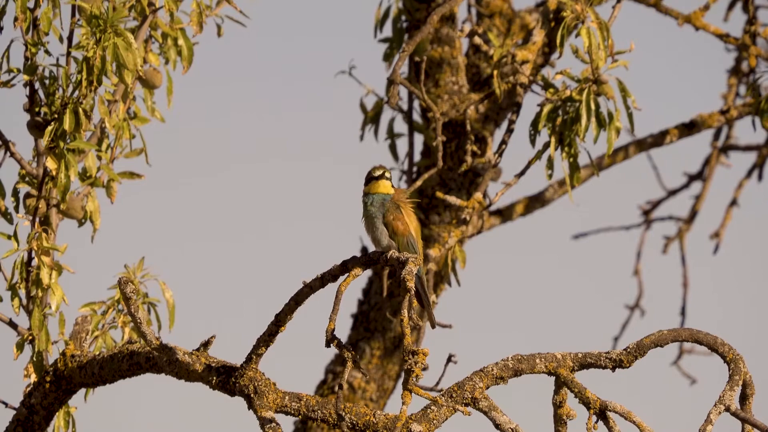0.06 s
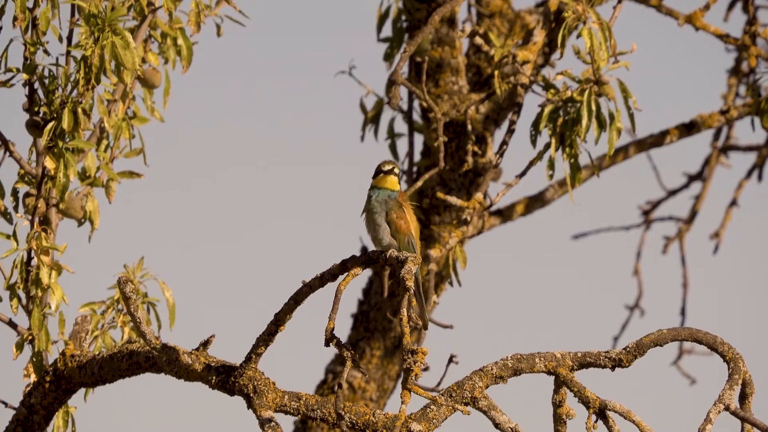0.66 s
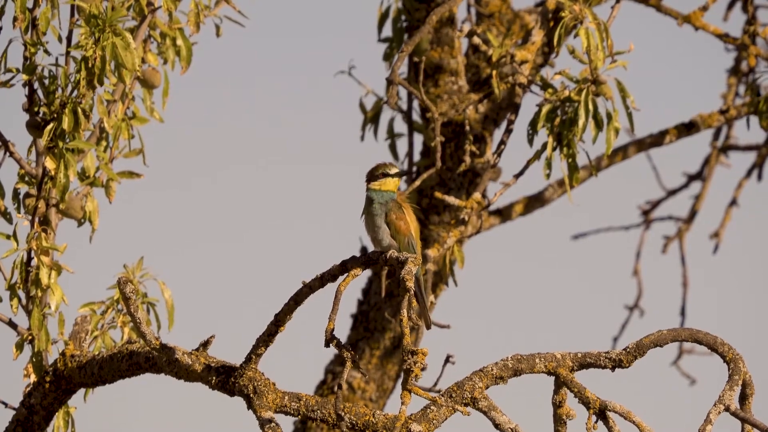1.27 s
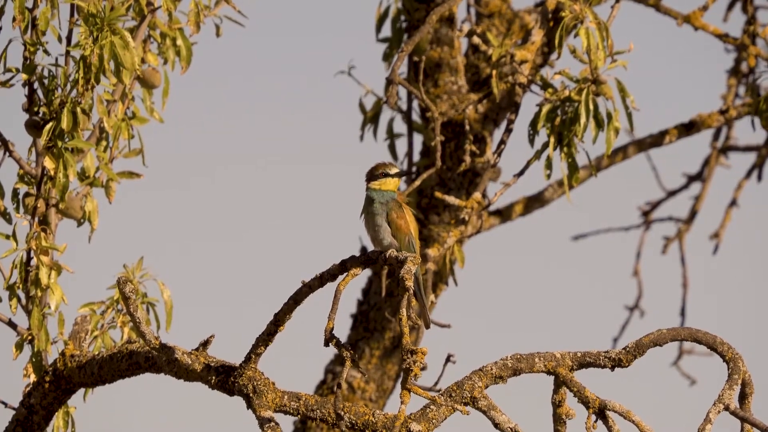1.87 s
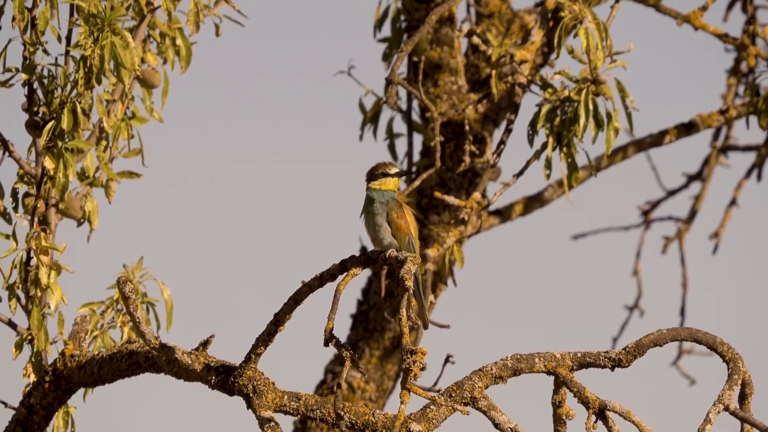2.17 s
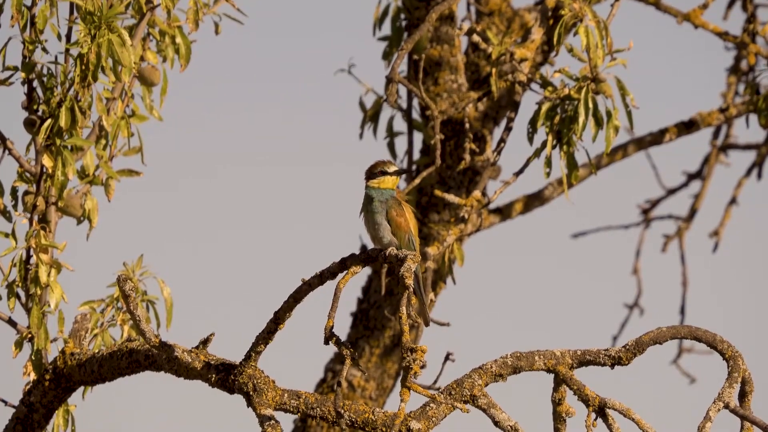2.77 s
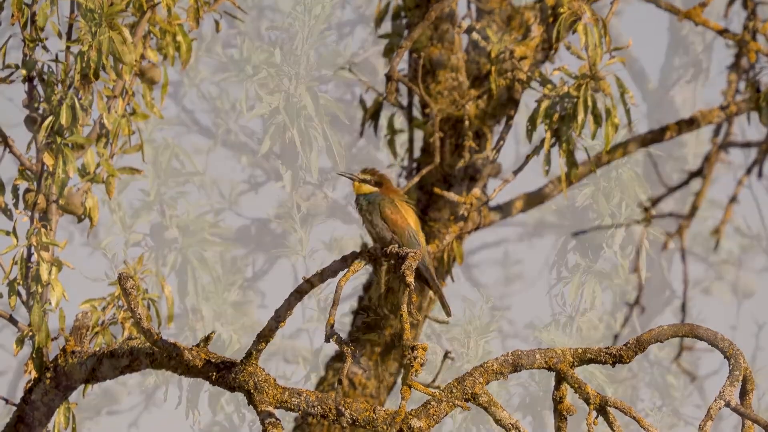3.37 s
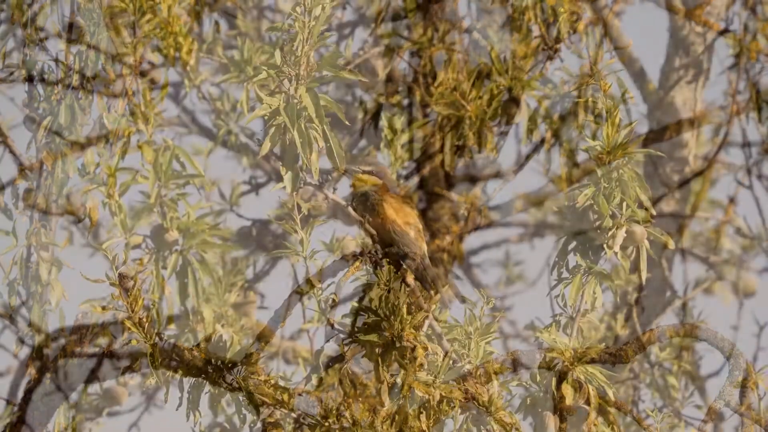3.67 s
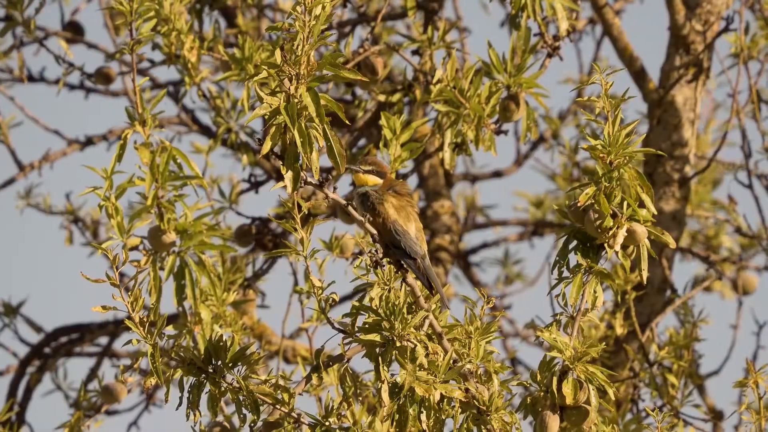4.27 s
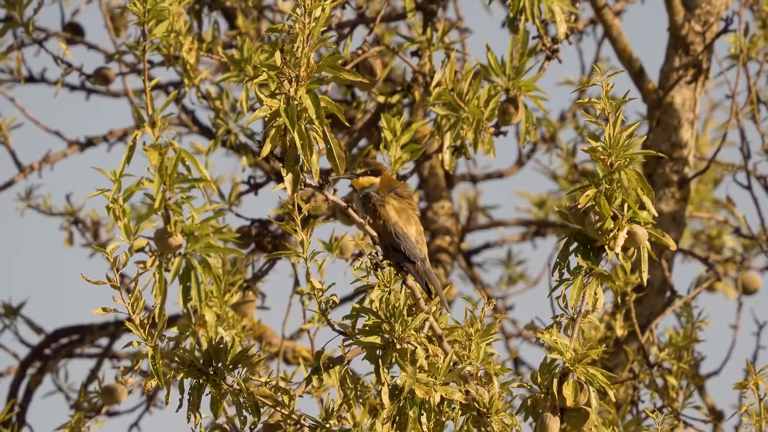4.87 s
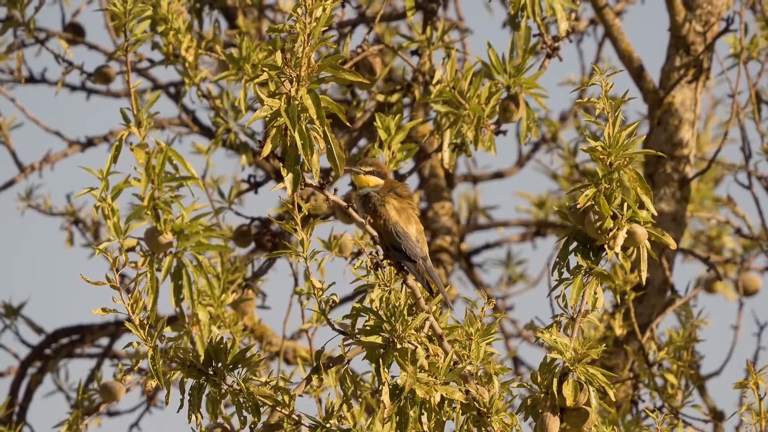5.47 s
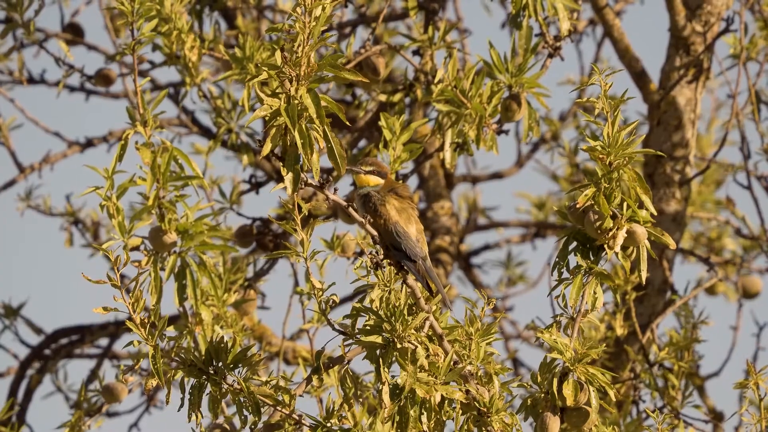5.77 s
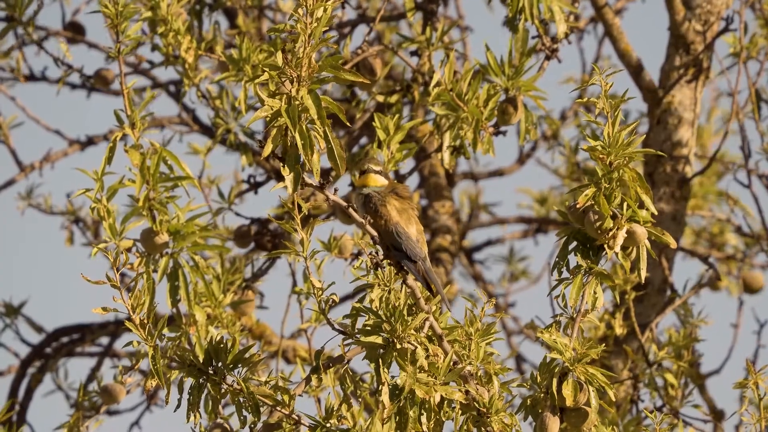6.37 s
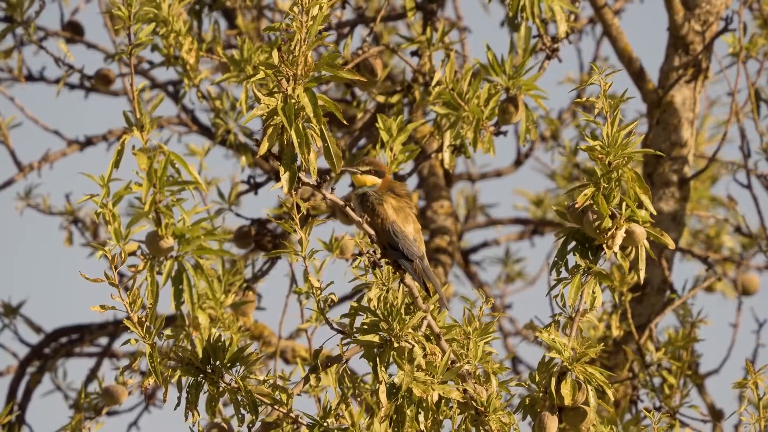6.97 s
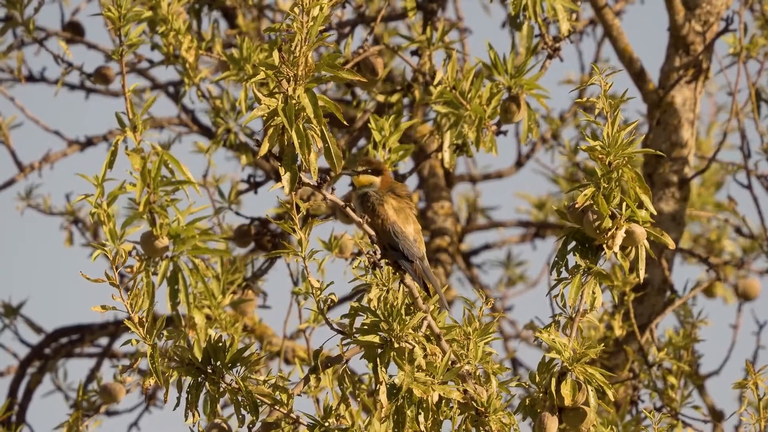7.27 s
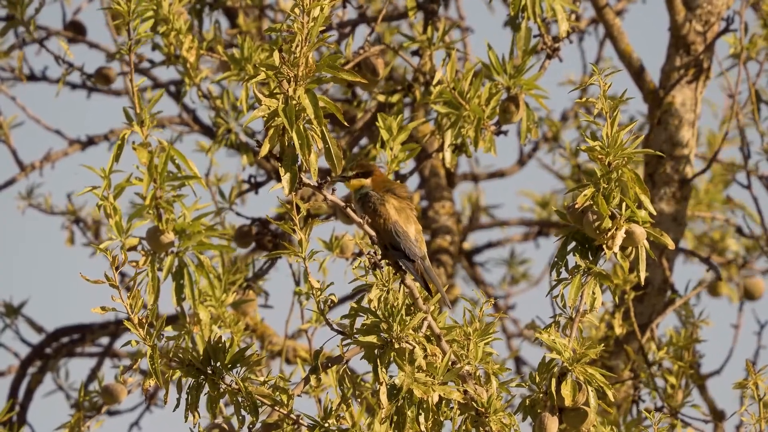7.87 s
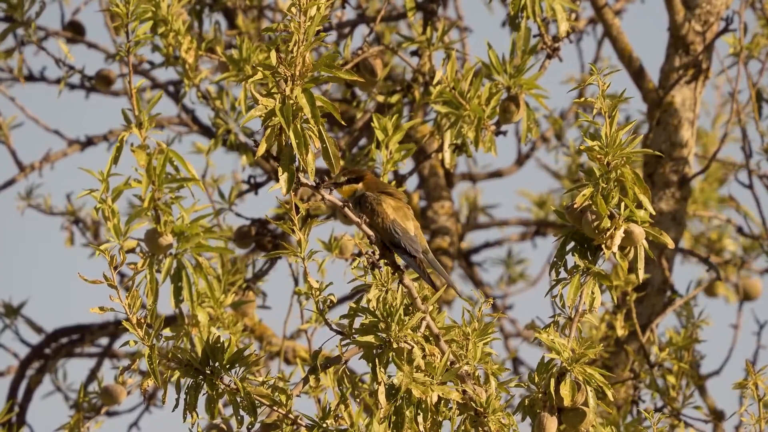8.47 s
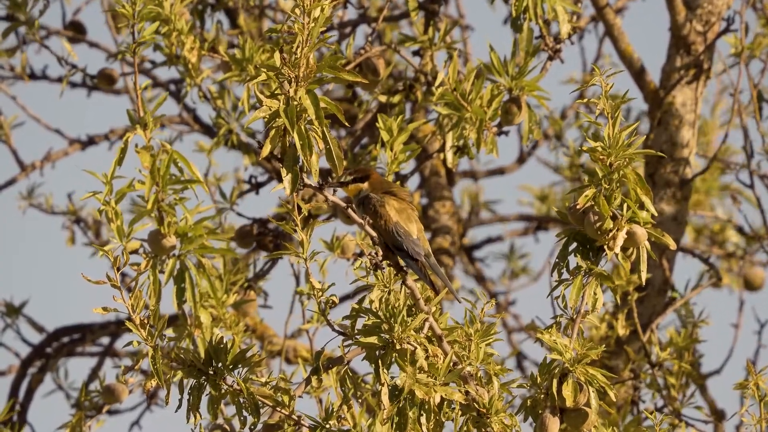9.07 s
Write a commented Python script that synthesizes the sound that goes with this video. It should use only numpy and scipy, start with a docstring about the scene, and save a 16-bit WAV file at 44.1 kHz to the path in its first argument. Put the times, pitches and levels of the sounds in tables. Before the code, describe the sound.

Short, rolling, whistled bird calls come in bursts from a nearby tree, while farther birds trill faintly above a soft wind rumble.

```python
"""Bee-eaters call from a tree in rolling phrases of whips, yelps and soft low whistles; others answer
from afar. Each syllable is one gliding tone, shaken by the syrinx and scattered by trunk and branches.
A small bird chips faintly, and a few dry ticks and brushes sound close by. Wind rumbles under a faint
hiss, and everything drops out for a moment a little before the middle."""
import sys
import numpy as np
from scipy import signal
from scipy.fft import rfft, irfft, next_fast_len
from scipy.io import wavfile
from scipy.ndimage import uniform_filter1d

SR = 44100
rng = np.random.default_rng(int(sys.argv[2]) if len(sys.argv) > 2 else 0)


def transcribe(signal):
    """Save signal, clipped to [-1, 1], as a 16-bit WAV file at the path in sys.argv[1]."""
    frames = np.atleast_2d(signal).T
    limited = np.clip(frames, -1, 1)
    pcm = np.round(limited * 32767).astype(np.int16)
    wavfile.write(sys.argv[1], SR, pcm)


N = 402191
TIME = np.arange(N) / SR
DROPOUT_START_S, DROPOUT_END_S = 3.62, 3.735


def bee_eaters(direct_db=-5, branches_db=-4, grove_db=-21, far_direct_db=-3, far_grove_db=-6):
    """Near birds come straight and off the branches; far ones carry more of the grove's echo."""
    flutter, roll = syrinx_flutter(), band_noise(59, 0.43)
    near, far = np.zeros((2, N))
    near_db, depth_db = -39.5, 21  # calls softer than near_db recede, fully far depth_db lower
    voices = [(call, np.clip((near_db - call[-1]) / depth_db, 0, 1)) for call in calls()]
    voices += [(call, 0) for call in linking_whistles()] + [(call, 1) for call in far_flock()]
    for (shape, start, length, pitch_hz, level_db), distance in voices:
        stretch = rng.integers(N - SR) + np.arange(SR // 2)  # every syllable shakes in its own way
        tone = syllable(shape, length, pitch_hz, level_db, flutter[stretch], roll[stretch])
        add(near, start, np.sqrt(1 - distance) * tone)
        add(far, start, np.sqrt(distance) * tone)
    near, far = throat(near), throat(far)
    direct = amp(direct_db) * near + amp(far_direct_db) * far
    right_lag_s = np.where(TIME < DROPOUT_START_S, .00003, .00011)  # later birds sit further left
    return (np.array([direct, np.interp(TIME - right_lag_s, TIME, direct)])
            + amp(branches_db) * scatter(near, t60=0.079, delay=0.0029)
            + amp(grove_db) * scatter(near, t60=0.42, delay=0.005)
            + amp(far_grove_db) * scatter(far, t60=0.36, delay=0.0049))


# Syllable contours. Each row: share of the length, pitch factor, level in dB, flutter from 0 to 1.
WHIP_SHAPE = [(0, .58, -21, .15), (.13, .69, -8, .4), (.27, 0.9, 2, 0.46), (.38, 0.96, 1.5, 0.36),
              (.49, 1.01, -4, 0.15), (.6, .97, -19, .3), (.8, .74, -17.5, .45), (1, .59, -20, .15)]
PRRUP_SHAPE = [(0, .66, -8.5, 0.054), (.12, .74, -8.5, .05), (.26, .84, -7.5, 0.1), (.29, .97, -3, 0.89),
               (.43, .93, -9.5, 0.45), (.55, 1.02, 4.5, 0.42), (.72, .97, -9, 0.45), (.86, .9, -14, 0.98),
               (1, .8, -22, 0.95)]
BURR_SHAPE = [(0, 1.02, -18, .7), (.12, .96, -6.5, .55), (.26, .95, -2, .5), (.42, .96, -9, .55),
              (.6, .99, 0, .6), (.74, .98, -2.5, .75), (.84, .98, -8, .75), (1, .88, -24, .7)]
YELP_SHAPE = [(0, .87, -16.5, .7), (.13, .81, -4.5, .45), (.36, 0.77, -13.5, .3), (.53, .89, 6, 0.45),
              (.64, 0.93, -1.5, .3), (.74, 1, -7.5, 0.85), (.85, 0.98, -15.5, .7), (1, 0.65, -11, 0.29)]
YAP_SHAPE = [(0, .72, -19.5, 0), (.15, .89, -5, 0.13), (.27, .93, -2.5, 0.31), (.39, 0.93, -12, 0),
             (.49, 1, -4.5, .45), (.63, 1, 0.5, .55), (.78, 0.98, -12, 0.76), (1, 0.76, -16, 0.99)]
SLUR_SHAPE = [(0, 1.08, -8, 0.99), (.14, 1.05, 3.5, 0.59), (.35, 1.03, 0, .4), (.6, .99, 7, .2),
              (.8, 0.89, -9, 0.22), (1, 0.77, -14, 0.38)]
TRILL_SHAPE = [(0, .78, -17, 0.083), (.2, .86, -4, 0.099), (.27, 1, -1.5, 0.57), (.55, 1.01, -2, 0.7),
               (.8, .98, 0.5, 0.5), (1, 0.83, -16.5, 1)]
# Sharp whips and single rolled "prrup" calls. Each row: start in seconds, level in dB.
WHIPS = [(.487, -27.5), (1.097, -27.5), (1.4, -28.5), (2.192, -51.5), (2.397, -51), (2.552, -49.5),
         (4.632, -30), (5.067, -27.5), (5.991, -22), (6.413, -21.5), (6.682, -23), (8.757, -25.5)]
PRRUPS = [(2.535, -46.5), (3.575, -46), (5.525, -28.5), (7.385, -27.5)]
# Burrs that close a phrase. Each row: start in seconds, pitch in Hz, level in dB.
BURRS = [(.918, 2042, -30.5), (1.262, 1877, -33.5), (1.56, 1965, -34.5), (6.543, 1950, -30.5),
         (6.846, 1910, -29.5)]
# Yelps, one loud yap, falling slurs and answering trills.
# Each row: start in seconds, length in seconds, pitch in Hz, level in dB.
YELPS = [(.636, 0.072, 2265, -32), (0.773, 0.083, 2263, -32), (4.785, 0.093, 2180, -33.5),
         (6.146, .087, 2332, -28), (8.915, 0.086, 2267, -30)]
YAPS = [(0.354, .086, 1950, -23)]
SLURS = [(.061, 0.053, 1755, -36.5), (4.943, 0.093, 1812, -39), (5.23, 0.046, 1728, -41.5),
         (6.294, .08, 1860, -32), (9.068, 0.082, 1800, -35)]
TRILLS = [(.145, .1, 2090, -50.5), (0.444, 0.075, 2100, -45.5), (.83, 0.084, 2150, -46.5),
          (2.164, 0.12, 2020, -55.5), (2.345, .15, 1943, -54), (2.646, 0.056, 2024, -48.5),
          (2.758, .14, 2008, -46.5), (2.894, .11, 2087, -54), (3.001, .13, 2005, -45.5),
          (3.114, .13, 2130, -46.5), (3.321, 0.16, 2022, -48.5), (4.273, .13, 2366, -54),
          (5.796, .15, 2170, -48), (7.045, .13, 2195, -48.5)]
WHIP_S = .072


def calls(whip_hz=2517, hz_per_db=3.5, usual_db=-27, burr_s=.087, prrup_s=.16, prrup_hz=2025):
    """The phrases as (shape, start, length, pitch, level); louder whips are a little higher."""
    score = [(WHIP_SHAPE, s, WHIP_S, whip_hz + hz_per_db * (db - usual_db), db) for s, db in WHIPS]
    score += [(BURR_SHAPE, s, burr_s, hz, db) for s, hz, db in BURRS]
    score += [(PRRUP_SHAPE, s, prrup_s, prrup_hz, db) for s, db in PRRUPS]
    for shape, rows in (YELP_SHAPE, YELPS), (YAP_SHAPE, YAPS), (SLUR_SHAPE, SLURS), (TRILL_SHAPE, TRILLS):
        score += [(shape, *row) for row in rows]
    return score


def linking_whistles(max_gap_s=.13, end_hz=1601, rise_hz_per_s=1145, flutter=.04):
    """Soft whistles dip, then rise into the next syllable; the longer the gap, the deeper and softer."""
    ends = [0]  # the first phrase is already under way
    ends += [s + WHIP_S for s, _ in WHIPS] + [s + length for s, length, *_ in YELPS]
    for start, *_ in YELPS + BURRS + SLURS:
        gap = min(start - end for end in ends if end < start)
        if gap < max_gap_s:
            dip = 1 - rise_hz_per_s * gap / end_hz
            shape = [(0, dip + (1 - dip) / 4, 0, flutter), (.2, dip, 0, flutter), (1, 1, -1.5, flutter)]
            level_db = -42 - 18 * gap
            yield shape, start - gap, gap, end_hz, level_db


# The voice's harmonics. Each row: multiple of the pitch, level in dB.
HARMONICS = [(1, -2), (2, -29), (3, -28.5)]


def syllable(shape, length, pitch_hz, level_db, flutter, roll, swing=0.16, throb=0.68, roll_db=5):
    """One gliding tone; the syrinx flutters in pitch and strength together, which adds side bands."""
    t = np.arange(int(length * SR)) / SR
    share, *columns = np.transpose(shape)
    glide, contour_db, depth = (np.interp(t / length, share, column) for column in columns)
    hz = pitch_hz * glide * (1 + swing * depth * flutter[:len(t)])
    phase = 2 * np.pi * np.cumsum(hz) / SR
    reedy_db = 4 - 15 * depth  # steady tones are reedier than fluttering ones
    tone = sum(amp(db + reedy_db * (k > 1)) * np.sin(k * phase) for k, db in HARMONICS)
    pulsing = np.exp(throb * depth * np.roll(flutter, 40)[:len(t)])  # trails pitch by a quarter cycle
    rolling = amp(roll_db * depth * roll[:len(t)])  # slower, uneven surges give the rolled "r"
    fade = np.clip(np.minimum(t, length - t) / 0.002, 0, 1)
    return np.sqrt(2) * amp(level_db + contour_db) * pulsing * rolling * fade * tone


def syrinx_flutter(rate_hz=250):
    """The syrinx's fast, ragged shake: its rate wanders, and slower random lurches ride on it."""
    turns = np.cumsum(rate_hz * (1 + .17 * band_noise(70, 1))) / SR
    return .88 * np.sin(2 * np.pi * turns) + .24 * band_noise(100, .5)


# The colour of throat and beak. Each row: frequency in Hz, gain in dB.
THROAT_EQ = [(1100, -14), (1450, -3), (1750, 2), (2400, -3.5), (2750, -13.5), (3200, 1), (3700, 0.5),
             (4200, -9.5), (5600, -13), (7000, -26)]


def throat(voice):
    """Throat and beak pass the fundamental and dull the high overtones."""
    size = next_fast_len(N + 4096)
    gain = amp(curve_at(THROAT_EQ, np.fft.rfftfreq(size, 1 / SR)))
    return irfft(rfft(voice, size) * gain, size)[:N]


def scatter(sound, t60, delay):
    """Trunks and branches return many small, dying reflections, different at each ear."""
    t = np.arange(SR // 2) / SR
    taps = rng.choice([-1., 1.], (2, len(t))) * (rng.random((2, len(t))) < .1)
    taps *= amp(-60 * t / t60) * np.clip(t / delay - 1, 0, 1)
    taps /= np.linalg.norm(taps, axis=1, keepdims=True)
    return signal.fftconvolve(sound[None], taps, axes=1)[:, :N]


# Bouts of distant trilling. Each row: start in seconds, end in seconds, level in dB.
FLOCK_BOUTS = [(0.263, .7, -54.5), (7.311, 7.7, -53), (7.783, 8.45, -55.5)]


def far_flock(every_s=.28, loose_s=.012, length_s=.09, pitch_hz=2074, spread=.045, vary_db=2):
    """Faint trills at a loose, even pace, each at its own pitch and strength."""
    cues = [(s, db) for start, end, db in FLOCK_BOUTS for s in np.arange(start, end, every_s)]
    for start, db in cues:
        late, high, loud = rng.standard_normal(3)
        hz = pitch_hz * (1 + spread * high)
        yield TRILL_SHAPE, start + loose_s * late, length_s, hz, db + vary_db * loud


# A small bird's chips. Each row: start in seconds, level in dB.
CHIPS = [(4.198, -61), (6.999, -57.5), (7.912, -59), (8.397, -59)]


def small_bird(length_s=.045, top_hz=3126, fall_hz_per_s=19000, peak_s=.0081, grove_db=-7):
    """Thin, pure chips slide quickly down and echo briefly in the grove."""
    chips, t = np.zeros(N), np.arange(int(length_s * SR)) / SR
    tone = np.sin(2 * np.pi * np.cumsum(top_hz - fall_hz_per_s * t) / SR)
    envelope = t / peak_s * np.exp(1 - t / peak_s)
    for start, level_db in CHIPS:
        add(chips, start, amp(level_db) * envelope * tone)
    return chips + amp(grove_db) * scatter(chips, t60=0.11, delay=.004)


# Dry ticks. Each row: start in seconds, level in dB, centre in Hz, width in octaves.
TICKS = [(0.95, -45.5, 11100, .8), (1.046, -50.5, 7500, 1.3), (3.128, -48, 12000, .5),
         (3.2, -39.5, 9000, 4.6), (4.344, -48, 13000, 0.6), (5.497, -53, 7060, 1.4),
         (5.726, -38, 1900, 2.3)]
# Light brushes. Each row: start in seconds, level in dB, centre in Hz.
BRUSHES = [(1.55, -50.5, 9500), (2.425, -58, 8060), (3.045, -51.5, 12600), (3.536, -53.5, 12500)]


def ticks_and_brushes(tick_decay_s=.0026, brush_decay_s=.03, brush_octaves=.88):
    """Dry puffs of coloured noise: ticks die at once, brushes linger."""
    out, t = np.zeros((2, N)), np.arange(8192) / SR
    puffs = [(*row, tick_decay_s) for row in TICKS]
    puffs += [(*row, brush_octaves, brush_decay_s) for row in BRUSHES]
    for start, level_db, centre_hz, octaves, decay_s in puffs:
        puff = band_pass(rng.standard_normal((2, len(t))), centre_hz, octaves)
        add(out, start, amp(level_db) * unit_rms(puff) * np.exp(-t / decay_s))
    return out


# Soft swells of wind, murmur and rustle, and one brief, faint hoot.
# Each row: peak time in seconds, level in dB, half width in seconds, centre in Hz, width in octaves.
SWELLS = [(1.94, -39.5, 0.28, 44, 0.57), (1.36, -54, 0.016, 830, 0.12), (3.05, -61, .24, 1000, 0.37),
          (3.2, -58.5, 0.43, 156, 0.53), (3.32, -67, 0.44, 8900, .7), (4.86, -62.5, 0.44, 246, 0.66),
          (4.76, -68, 0.16, 4890, 0.21), (3.95, -59.5, 0.77, 101, 0.86)]
# How centred swells and beds sound. Each row: frequency in Hz, left-right likeness from 0 to 1.
EAR_LIKENESS = [(60, 1), (130, 0.79), (290, 0.39), (640, 0.68), (1410, 0.47), (3100, .25), (6800, 0.096),
                (15000, 0.057)]


def swells():
    """Bands of noise that rise and sink again; the low ones are more alike at both ears."""
    out = np.zeros((2, N))
    for peak_s, level_db, width_s, centre_hz, octaves in SWELLS:
        likeness = curve_at(EAR_LIKENESS, centre_hz)
        mid = np.sqrt((1 + likeness) / 2) * band_noise(centre_hz, octaves)
        side = np.sqrt((1 - likeness) / 2) * band_noise(centre_hz, octaves)
        envelope = np.exp(-((TIME - peak_s) / width_s) ** 2)
        out += amp(level_db) * envelope * np.array([mid + side, mid - side])
    return out


# The wind's rise and fall. Each row: time in seconds, level in dB.
WIND_LEVEL = [(0, -42.5), (1.5, -41.5), (1.65, -38.5), (2.9, -42.5), (3.5, -46), (4.3, -47.5), (5.7, -45),
              (9.1, -46.5)]
# The colours of three noise beds. Each row: frequency in Hz, relative density in dB.
RUMBLE_SPECTRUM = [(8.8, -27), (15, -4.5), (40, -5.5), (73, -8.5), (123, -21.5), (194, -23), (330, -37),
                   (430, -65), (730, -120)]
AIR_SPECTRUM = [(180, -17.5), (300, -5.5), (345, -15), (383, -4), (446, -3), (525, -4.5), (566, -13),
                (603, -3), (642, 1), (761, -3), (1100, -5.5), (1270, -9), (1320, -33), (1350, -3),
                (1760, -18.5), (2970, -120)]
HISS_SPECTRUM = [(710, -23.5), (1200, -9.5), (1440, -4), (1680, -5.5), (1930, -4), (2320, -8.5), (2840, -8),
                 (3490, -12.5), (5200, -10), (6590, -16.5), (8010, -10), (9620, -15.5), (11700, -14),
                 (14800, -19), (15800, -38)]


def wind(usual_db=-44, rumble_db=-2, air_db=-61.5, hiss_db=-67.5):
    """Wind rumbles over a deep drone; the murmur of open air and the hiss follow it a little."""
    wind_db = np.interp(TIME, *np.transpose(WIND_LEVEL))
    gust_db = wind_db - usual_db
    bass = amp(rumble_db) * noise_bed(RUMBLE_SPECTRUM) + drone()
    hiss = amp(hiss_db + 0.045 * gust_db) * noise_bed(HISS_SPECTRUM, above_hz=5000)
    air = amp(air_db + 0.27 * gust_db) * noise_bed(AIR_SPECTRUM)
    return amp(wind_db) * bass + air + hiss


def drone(pitch_hz=28.2, waver=0.092, swell_db=2):
    """A very low tone that drifts in pitch and strength."""
    turns = np.cumsum(pitch_hz * (1 + waver * band_noise(3.42, 0.73))) / SR
    return np.sqrt(2) * amp(swell_db * band_noise(8.3, 0.33)) * np.sin(2 * np.pi * turns)


# The panning of the beds. Each row: frequency in Hz, left minus right in dB.
BED_PAN = [(60, 0.5), (110, -1.5), (200, 0), (380, -1.5), (700, -1), (1290, -1.5), (2380, 1.0), (4400, 1.5),
           (8120, -0.5), (15000, -4.5)]


def noise_bed(spectrum, above_hz=0, right_lag_s=.00008):
    """Coloured stereo noise, centred in the bass; its mid signal has rms 1 above above_hz."""
    size = next_fast_len(N)
    hz = np.fft.rfftfreq(size, 1 / SR)
    mid, side = rfft(rng.standard_normal((2, size))) * amp(curve_at(spectrum, hz))
    likeness, pan_db = curve_at(EAR_LIKENESS, hz), curve_at(BED_PAN, hz)
    mid *= np.sqrt((1 + likeness) / 2)
    side *= np.sqrt((1 - likeness) / 2)
    left = (mid + side) * amp(pan_db / 2)
    right = (mid - side) * amp(-pan_db / 2) * np.exp(-2j * np.pi * hz * right_lag_s)
    mid_rms = np.std(irfft(mid * (hz >= above_hz), size)[:N])
    return irfft([left, right], size)[:, :N] / mid_rms


def band_noise(centre_hz, octaves):
    """Noise in a bell-shaped band, rms 1."""
    return unit_rms(band_pass(rng.standard_normal(next_fast_len(N)), centre_hz, octaves)[:N])


def band_pass(x, centre_hz, octaves):
    """A bell-shaped filter on an octave scale."""
    size = x.shape[-1]
    hz = np.fft.rfftfreq(size, 1 / SR) + 1
    return irfft(rfft(x) * np.exp(-.5 * (np.log2(hz / centre_hz) / octaves) ** 2), size)


def amp(db):
    """Decibels to gain."""
    return 10 ** (np.asarray(db) / 20)


def unit_rms(x):
    """Scales to rms 1."""
    return x / np.sqrt(np.mean(x ** 2) + 1e-20)


def curve_at(points, hz):
    """Reads a curve on a log-frequency axis."""
    point_hz, value = np.transpose(points)
    return np.interp(np.log(hz + 1), np.log(point_hz + 1), value)


def add(mix, start_s, sound):
    """Mixes a sound in at its start time."""
    part = mix[..., max(round(start_s * SR), 0):][..., :sound.shape[-1]]
    part += sound[..., :part.shape[-1]]


def scene():
    """Birds and small close noises over the wind."""
    return bee_eaters() + small_bird() + ticks_and_brushes() + swells() + wind()


def record(dry):
    """The sound drops out briefly, and the highest treble is cut."""
    audible = (TIME < DROPOUT_START_S) | (TIME > DROPOUT_END_S)
    gate = uniform_filter1d(audible.astype(float), size=64)
    low_pass = signal.firwin(511, cutoff=15850, window=("kaiser", 9), fs=SR)
    return signal.oaconvolve(dry * gate, low_pass[None], "same")


dry = scene()
out = record(dry)
transcribe(out)
```